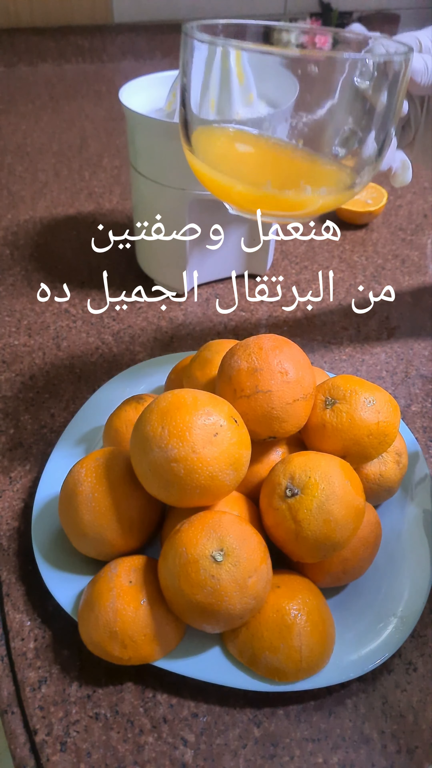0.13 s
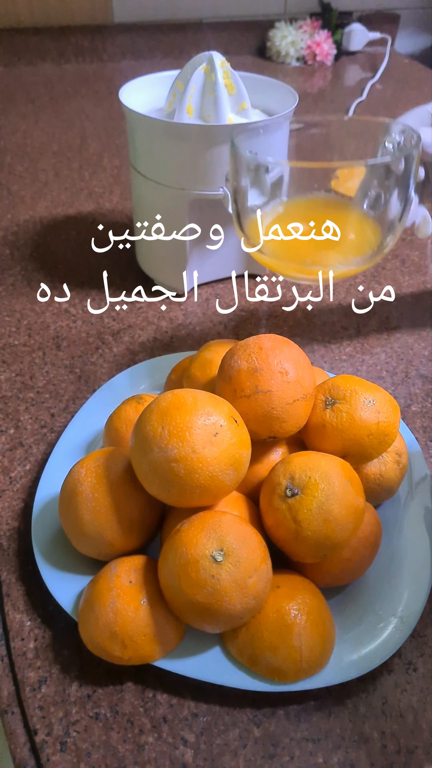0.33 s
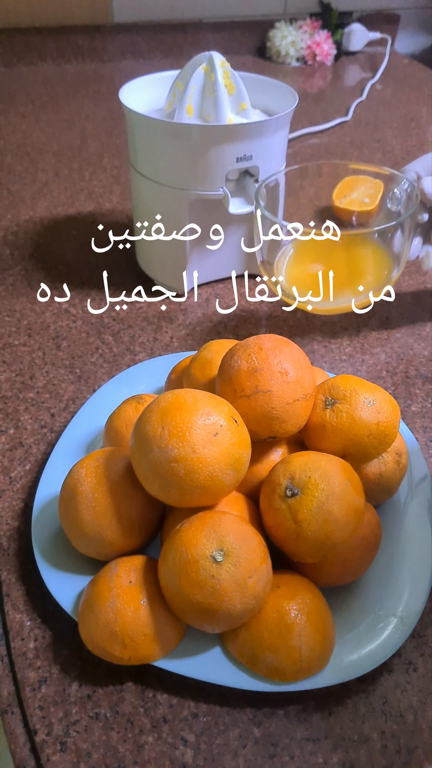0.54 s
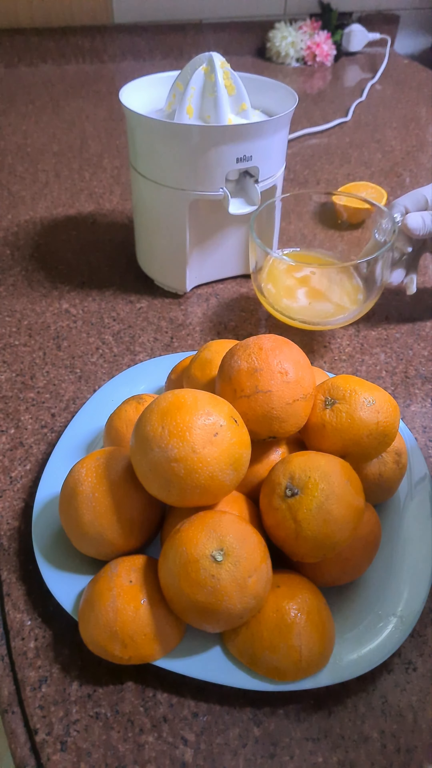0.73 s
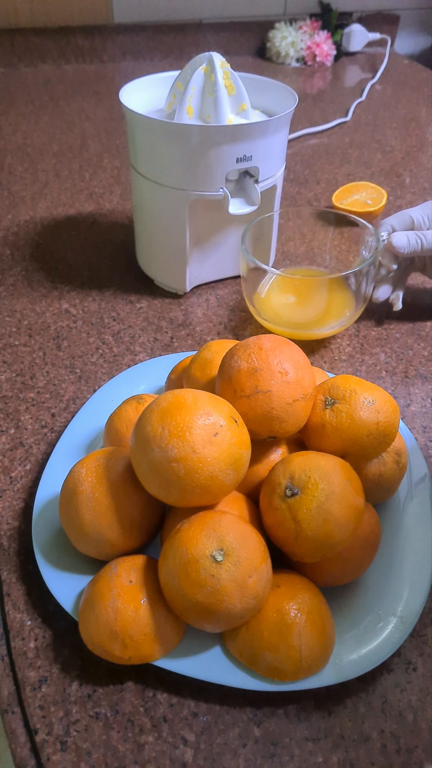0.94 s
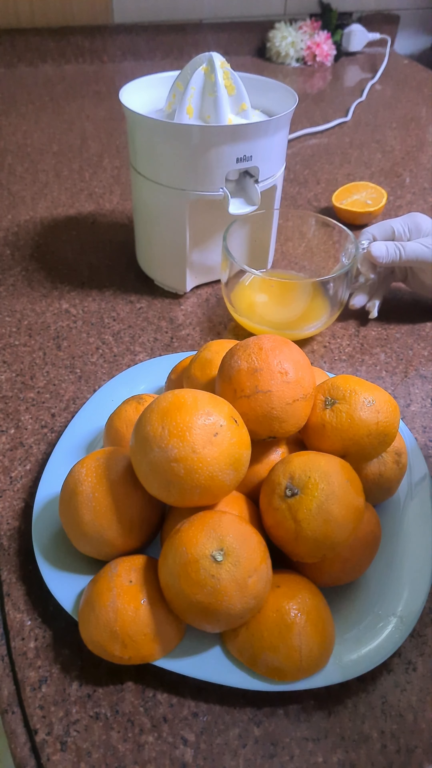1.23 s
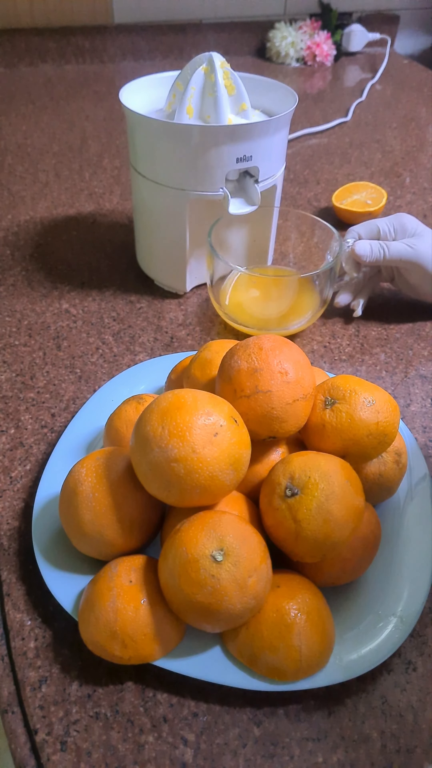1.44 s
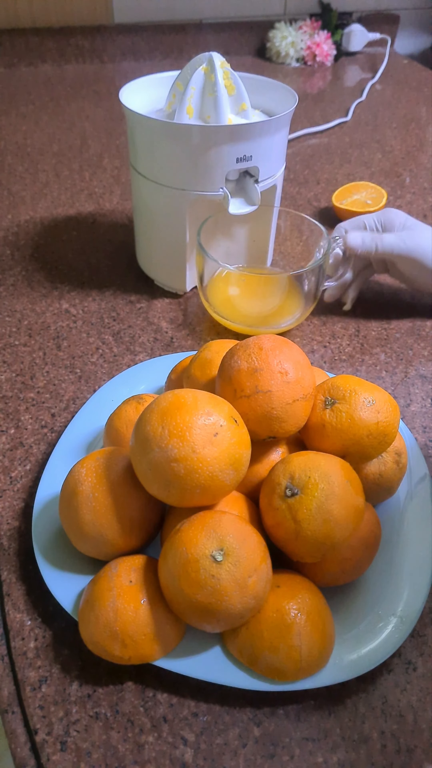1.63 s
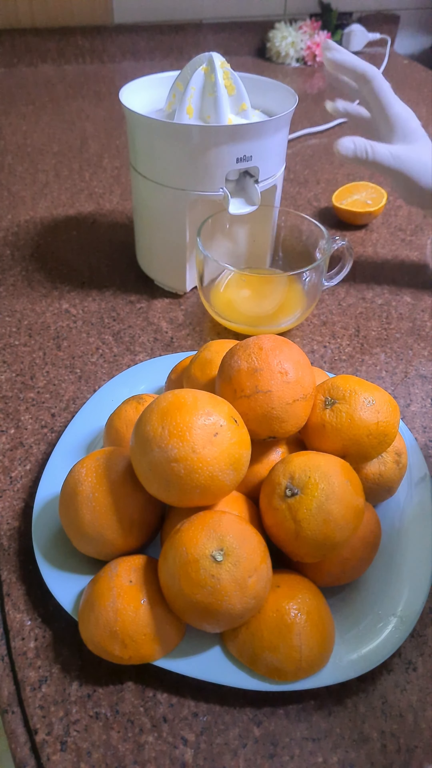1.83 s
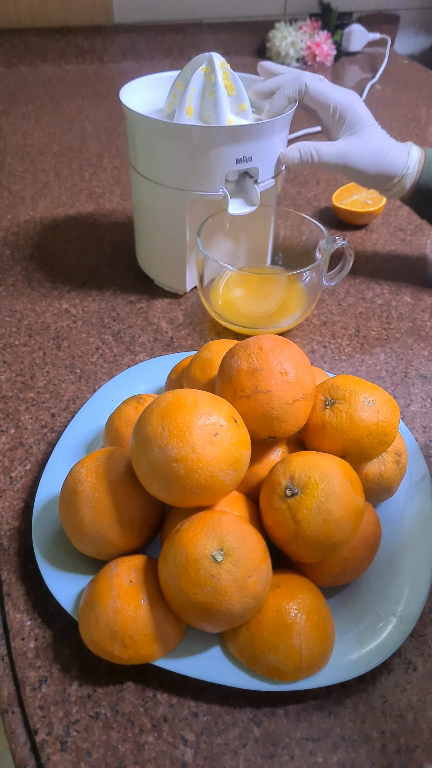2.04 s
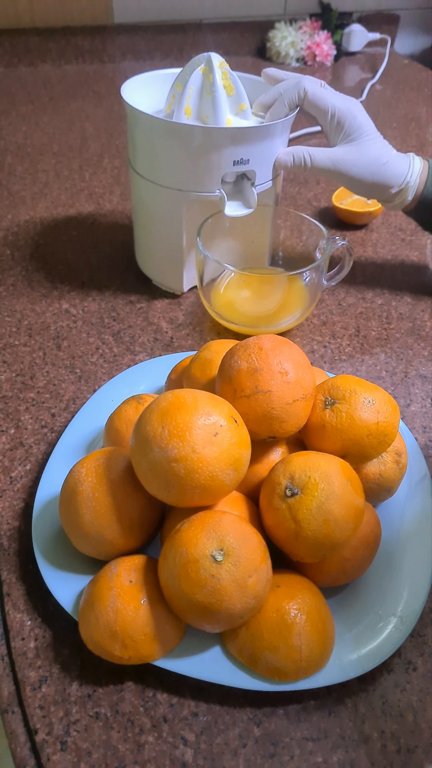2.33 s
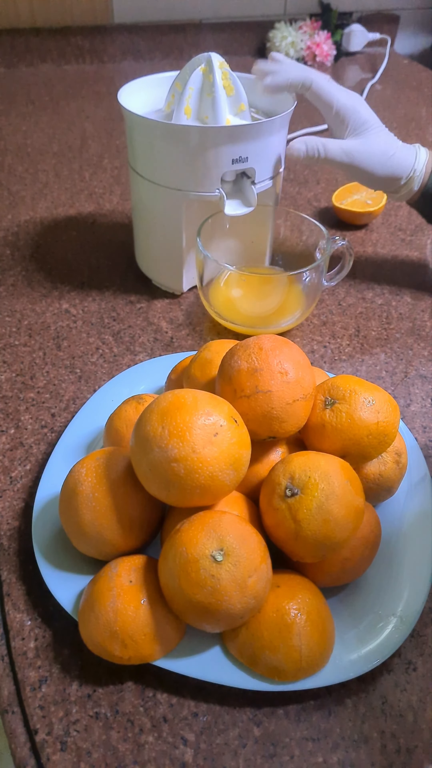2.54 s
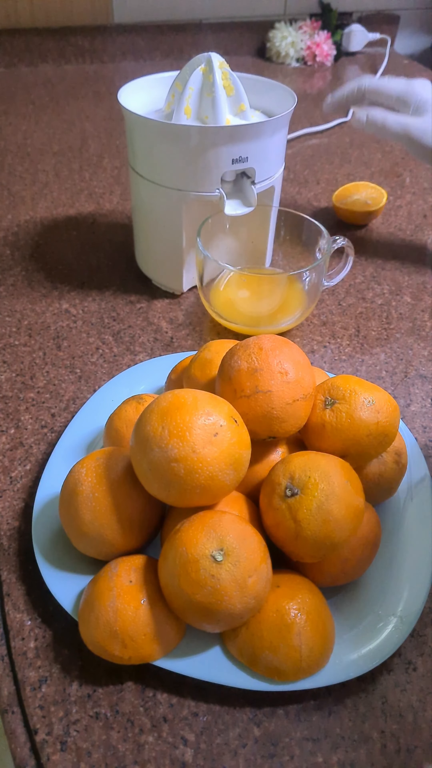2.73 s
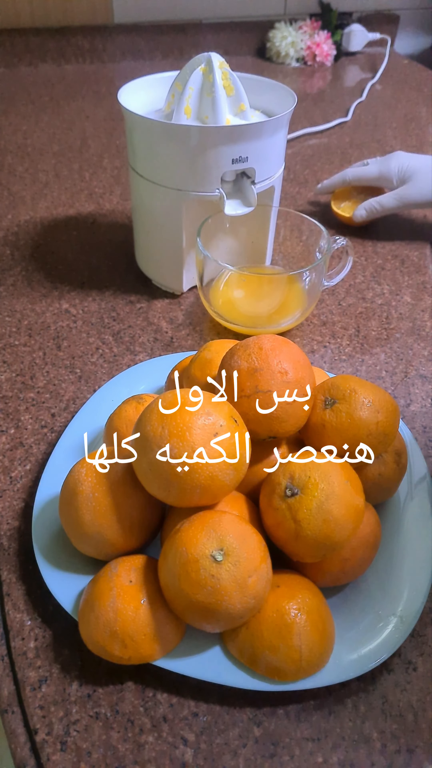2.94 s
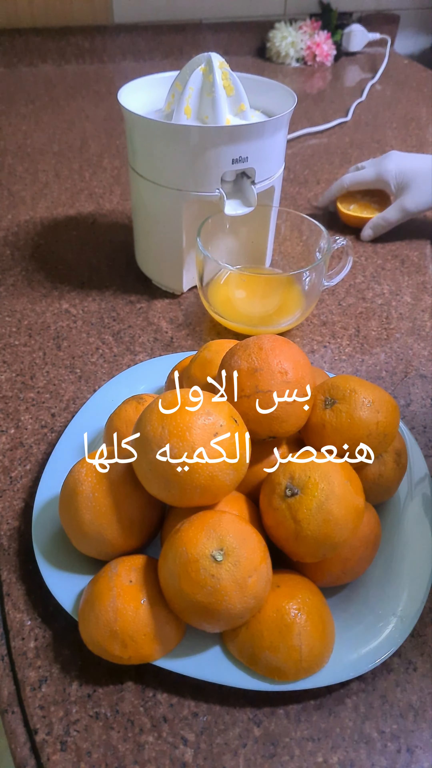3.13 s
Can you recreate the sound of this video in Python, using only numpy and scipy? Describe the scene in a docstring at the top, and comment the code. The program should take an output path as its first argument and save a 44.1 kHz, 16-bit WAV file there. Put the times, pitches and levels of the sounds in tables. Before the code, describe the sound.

In a small hard kitchen, heavy glass lands on stone, plastic gets one hollow knock, and a geared juicer motor starts buzzing steadily.

```python
"""In a small, hard kitchen a glass mug lands, rocks and skids on a stone counter under an electric juicer.
A gloved hand rubs, taps the plastic bowl and knocks the cone: impulses excite short clacks and decaying modes.
Then the motor starts and slows a little under load. Its gears whine on multiples of the shaft speed,
its teeth scrape once each as noise bursts, and its cone rumbles with bumps that repeat every turn.
Faint squeaks are unsteady sines; shaped noise and wavering sines make the kitchen's air, hiss and hum."""
import sys
import numpy as np
from scipy import signal
from scipy.fft import rfft, irfft, next_fast_len
from scipy.io import wavfile

SR = 44100
rng = np.random.default_rng(int(sys.argv[2]) if len(sys.argv) > 2 else 0)


def to_wav(sig):
    """Store sig (one row per channel, or 1-D mono) as 16-bit WAV at the path in sys.argv[1].

    Samples outside -1..1 are clipped; the rate is SR.
    """
    pcm = np.clip(np.atleast_2d(sig), -1, 1) * 32767
    pcm = np.round(pcm).astype(np.int16)
    wavfile.write(sys.argv[1], SR, pcm.T)  # frames by channels


N = 329427
TIME = np.arange(N) / SR

# All levels in the tables are relative: layers are scaled again where they are mixed.
# Gear tones: shaft_multiple, light_load_db, medium_load_db, full_load_db
GEAR_TONES = [(13, -60, -58, -53), (18, -58, -55, -54), (22, -56, -57, -54), (26, -38, -40, -40),
              (30, -60, -50, -56), (35, -45, -51, -57), (39, -50, -44, -41), (47, -62, -49, -45),
              (48, -44, -41, -37), (50, -46, -47, -44), (52, -35, -30, -33), (56, -49, -46, -43),
              (65, -43, -45, -47), (69, -46, -49, -63), (74, -44, -60, -55), (78, -36, -54, -56),
              (82, -48, -56, -65), (91, -44, -57, -51), (95, -49, -63, -54), (99, -52, -63, -54),
              (104, -60, -65, -50), (109, -51, -60, -69), (112, -58, -48, -57), (117, -63, -49, -52),
              (120, -67, -59, -50)]
# Spectrum of the tooth scrape: frequency_hz, density_db
RATTLE_SPECTRUM = [(300, -20), (800, -6), (1250, -0.5), (1500, -3.5), (2100, -3.5), (2680, -0.5),
                   (2880, 4.5), (3150, -2.5), (3600, -4), (4300, -9.5), (6400, -13.5), (7250, -18),
                   (7900, -33.5), (12000, -29), (16000, -39)]
# Spectrum of the slack gears' chatter: frequency_hz, density_db
CHATTER_SPECTRUM = [(200, -32), (520, 3), (800, 2.5), (1200, 8.5), (1700, 5), (2200, 4.5), (3000, -23),
                    (7000, -55)]
# Spectrum of the turning cone: frequency_hz, density_db
RUMBLE_SPECTRUM = [(100, -10), (200, -8), (310, 4.5), (540, -1), (780, -3), (1200, 0), (2200, -4.5),
                   (4000, -46)]
# Jolts of the cone as it starts and snags: start_s, length_s, level_db
CONE_JOLTS = [(5.3, 0.051, -44), (6.43, 0.055, -41)]
# Stereo balance of the juicer: frequency_hz, left_minus_right_db
JUICER_TILT = [(200, 1), (700, 2.5), (1300, 1), (2400, -1), (4400, -3), (8000, 4), (15000, -2.5)]
# Glass mug rocking on the stone: start_s, level_db
MUG_IMPACTS = [(1.0061, -2), (1.0468, -9), (1.1394, -15), (1.1553, -21), (1.1649, -23), (1.2045, -22),
               (1.2976, -19), (1.3011, -22), (1.4312, -19), (1.5188, -31)]
# Stick-slip skids of its base: start_s, length_s, slip_rate_hz, level_db
MUG_SLIDES = [(1.266, 0.01, 583, -23), (1.285, .012, 593, -26)]
# Contact of glass on stone: frequency_hz, density_db
MUG_CONTACT = [(90, -34.5), (200, -6.5), (700, -2.5), (1000, 6.5), (1400, 0.5), (1750, 2.5), (2300, -7.5),
               (2750, -13), (3100, -27.5), (3650, -26.5), (4700, -28), (6000, -40.5), (7100, -49.5),
               (8000, -60.5), (12500, -45), (16000, -49)]
# Ringing of the glass: frequency_hz, level_db, t60_s
MUG_RING = [(1184, -24, .36), (935, -26, .25), (1790, -30, .08), (2500, -27, .15), (2772, -27, .12),
            (6654, -50, .22), (7058, -53, .16), (9050, -64, .22)]
# Finger tap on the juice bowl: start_s, level_db
BOWL_TAPS = [(2.354, -33)]
# Contact of finger on bowl: frequency_hz, density_db
BOWL_CONTACT = [(150, -4), (320, 15), (550, 14), (900, 6.5), (1500, 14), (2200, -10.5), (5000, -7.5),
                (7000, -21), (8500, -87), (16000, -24)]
# Ringing of the bowl: frequency_hz, level_db, t60_s
BOWL_RING = [(544, -16, .22), (1325, -19, .36), (1793, -16, .1), (2670, -32, .35), (2826, -37, .2),
             (4750, -34, .07)]
# Knock on the plastic cone: start_s, level_db
CONE_KNOCKS = [(4.189, -14)]
# Contact on the cone: frequency_hz, density_db
CONE_CONTACT = [(130, -32), (280, -7), (800, 8), (1300, 5), (1800, -6), (2200, -0.5), (2650, -10),
                (2950, -1.5), (3900, -1), (5200, -10.5), (7000, -23.5), (8500, -33.5), (12000, -22),
                (16000, -33)]
# Ringing of the cone: frequency_hz, level_db, t60_s
CONE_RING = [(572, -8, 0.077), (844, -18.5, 0.2), (1218, -15, 0.12), (1500, -46, .12), (2200, -29, 0.11),
             (3520, -33, 0.096)]
# Soft, dull touches of the hand: start_s, level_db
HAND_TOUCHES = [(2.0, -50.5), (2.045, -49), (2.11, -53), (2.16, -59), (2.53, -51), (4.418, -49),
                (4.516, -40.5), (4.817, -42.5), (4.873, -39.5)]
# Contact of the hand: frequency_hz, density_db
TOUCH_CONTACT = [(150, -18.5), (520, 6.5), (800, -5.5), (1400, -3.5), (2200, -13.5), (5000, -22.5),
                 (8500, -39), (16000, -38)]
# Small dry ticks of plastic: start_s, level_db
PLASTIC_TICKS = [(1.7793, -52.5), (1.985, -43.5), (3.6799, -59.5), (4.5097, -41), (4.6933, -51),
                 (5.249, -49), (7.1536, -34.5), (7.2195, -37), (7.3494, -36)]
# Contact of a tick: frequency_hz, density_db
TICK_CONTACT = [(800, -27), (2800, 6), (6500, 3), (8500, -15.5), (12000, -4), (16000, -15)]
# Strokes of the rubber glove on peel and plastic: start_s, length_s, level_db
RUBBING_STROKES = [(1.76, 0.061, -63), (2.68, 0.14, -65.5), (2.8, 0.54, -64.5), (3.33, 0.23, -62.5),
                   (3.63, 0.086, -64), (4.35, 1, -68)]
# Spectrum of the rubbing glove: frequency_hz, density_db
GLOVE_SPECTRUM = [(300, 7), (600, 7), (1500, -6), (3200, -0.5), (6200, 0.5), (8300, -17), (12000, -7.5),
                  (16000, -22)]
# Faint thin squeaks: start_s, length_s, pitch_hz, level_db
RUBBING_SQUEAKS = [(.1, .5, 4820, -81), (1.63, .07, 4760, -68), (4.54, .28, 3290, -74)]
# Spectrum of the kitchen air: frequency_hz, density_db
AIR_SPECTRUM = [(25, -7), (55, -4.5), (110, -9.5), (150, -8), (220, -13.5), (310, -13.5), (410, -21),
                (540, -21.5), (900, -36), (1300, -32.5), (2300, -40.5), (5000, -67)]
# Spectrum of the faint hiss: frequency_hz, density_db
HISS_SPECTRUM = [(1000, -12), (2300, -9.5), (3150, 2), (4400, -6.5), (5600, -0.5), (6600, -9.5),
                 (7700, -25), (9500, -24), (11800, -8.5), (16000, -14)]
# Tones of the hum: pitch_hz, level_db
HUM_TONES = [(48.4, -62), (96.9, -70), (140, -66.5)]
# Stereo balance of the background: frequency_hz, left_minus_right_db
KITCHEN_TILT = [(50, -1), (200, -3.5), (600, 2.5), (2200, -3), (4000, 5), (12000, 6.5)]
# Reverberation of the kitchen: frequency_hz, t60_s
REVERBERATION = [(200, 0.81), (530, 0.61), (1400, 0.4), (3700, 0.42), (12000, 0.23)]

PINION_TEETH = 13
# the motor spins up, then the hand bears down evenly until the load is full
START_S, SPIN_UP_S, PRESS_S, PRESS_RISE_S = 5.28, 0.1, 5.5, 1.08
# shaft speed as the gears catch, running free, and its sag at full load
CATCH_HZ, FREE_HZ, SAG_HZ = 18, 25.75, 1.39
# play of the shaft: loose at the start until it settles, least when free, growing steeply near full load
START_PLAY_DEG, SETTLE_S, FREE_PLAY_DEG, LOAD_PLAY_DEG, PLAY_POWER = 5.5, 0.065, 0.38, 0.93, 4
# level of each layer running free, and what full load adds
WHINE_DB, WHINE_LOAD_DB = -28.5, 1.5
RATTLE_DB, RATTLE_LOAD_DB = -38, 2.5
RUMBLE_DB, RUMBLE_LOAD_DB = -48.5, 7.5
# the whine fades in while the teeth seat themselves
WHINE_ATTACK_S, WHINE_START_DB = 0.26, -10.5
# the cone bites into the fruit and the teeth rattle harder
BITE_S, BITE_RISE_S, BITE_DB = 5.8, 0.11, 3
# the slack gears chatter early on, then fall quiet
CHATTER_DB, CHATTER_ATTACK_S, CHATTER_HOLD_S, CHATTER_RELEASE_S = -36.5, 0.06, 0.3, 0.38
AIR_DB, HISS_DB = -60, -72
PORT_LAG_MS = 0.14  # arrival at the right port after the left
TOP_HZ = 15900


def juicer(tooth_decay=0.31, wear_db=2.5, scatter_db=3.0, slack_loss_db=1.3):
    """Periodic excitation by rotation: gear tones, a scrape for every tooth, and a cone that rumbles."""
    shaft_hz, load, play = drive()
    turns = np.cumsum(shaft_hz) / SR
    tooth, mesh = np.divmod(turns * PINION_TEETH, 1)
    tooth = tooth.astype(int)
    # each tooth keeps its own wear, so the clatter repeats every turn, with scatter from stroke to stroke
    worn_db = wear_db * rng.standard_normal(PINION_TEETH)[tooth % PINION_TEETH]
    size_db = worn_db + scatter_db * rng.standard_normal(2 ** 13)[tooth]
    scrape = undb(size_db) * np.exp(-mesh / tooth_decay) * rng.standard_normal(N)
    rattle = unit(in_room(colour(scrape, RATTLE_SPECTRUM), wet_db=4.5, near_db=-16))
    chatter = unit(in_room(colour(scrape, CHATTER_SPECTRUM), wet_db=6, near_db=12))

    # the same bumps on every turn of the shaft, over the noise of rubbing
    bumps = np.interp(turns % 1, np.linspace(0, 1, 256), rng.standard_normal(256))
    rubbing = diffuse(N) + undb(-9.5) * bumps
    rumble = unit(colour(rubbing, RUMBLE_SPECTRUM)) * undb(1.1 * walk(20))

    # teeth that bounce in their slack give less tone
    unseated_db = WHINE_START_DB * (1 - ramp(START_S, WHINE_ATTACK_S))
    whine_db = WHINE_DB + WHINE_LOAD_DB * load + unseated_db - slack_loss_db * play
    tones = undb(whine_db) * whine(shaft_hz, turns, load, play)

    # faster teeth strike harder
    rattle_db = RATTLE_DB + RATTLE_LOAD_DB * load + BITE_DB * ramp(BITE_S, BITE_RISE_S)
    rattle_gain = (shaft_hz / FREE_HZ) ** 2 * undb(rattle_db)
    rumble_gain = undb(RUMBLE_DB + RUMBLE_LOAD_DB * load) + swells(CONE_JOLTS)
    release_s = START_S + CHATTER_ATTACK_S + CHATTER_HOLD_S
    slack = ramp(START_S, CHATTER_ATTACK_S) - ramp(release_s, CHATTER_RELEASE_S)
    sound = tones + rattle_gain * rattle + rumble_gain * rumble + undb(CHATTER_DB) * slack * chatter
    switched_on = ramp(START_S, 0.023) ** 2
    return lean(sound * switched_on, JUICER_TILT)


def drive():
    """Motor under load: pressing slows the shaft and widens its play (gives Hz, load 0-1, degrees)."""
    load = ramp(PRESS_S, PRESS_RISE_S)
    shaft_hz = CATCH_HZ + (FREE_HZ - CATCH_HZ) * ramp(START_S, SPIN_UP_S) - SAG_HZ * load
    unsettled = np.exp(-np.maximum(TIME - START_S, 0) / SETTLE_S)
    play = FREE_PLAY_DEG + START_PLAY_DEG * unsettled + LOAD_PLAY_DEG * load ** PLAY_POWER
    return shaft_hz, load, play


def whine(shaft_hz, turns, load, play, flutter_db=2.5, throb_db=1.24, echo_db=-2,
          shell_width_hz=6, shell_db=8, side_db=-0.5, side_play=0.31):
    """Harmonic series of the shaft: tooth-mesh harmonics and the side tones of uneven teeth."""
    shell_hz = 1998
    wobble = np.radians(play) * walk(55)  # play in the shaft smears the high tones most
    grab_db = throb_db * load * walk(70)  # under load the teeth grab and let go in quick bursts
    out = np.zeros((2, N))
    on = TIME > START_S
    for k, *levels in GEAR_TONES:
        is_mesh = k % PINION_TEETH == 0
        hz = k * shaft_hz[on]
        angle = k * (2 * np.pi * turns + wobble * (1 if is_mesh else side_play))[on]
        db = np.interp(load[on], np.linspace(0, 1, len(levels)), levels) + (0 if is_mesh else side_db)
        db = db + (grab_db + flutter_db * walk(22))[on]
        # a tone crossing the shell's resonance flares up
        db = db + shell_db / (1 + ((hz - shell_hz) / shell_width_hz) ** 2)
        for ch in range(2):
            # reflections add a restless copy, different at each port and stronger for short waves
            restless = (walk(26)[on] + 1j * walk(26)[on]) / np.sqrt(2)
            echo = undb(echo_db) * np.minimum(hz / 1200, 1) * restless
            lag = 2 * np.pi * hz * ch * PORT_LAG_MS / 1000
            out[ch, on] += undb(db) * np.real((1 + echo) * np.exp(1j * (angle - lag)))
    return out / np.sqrt(np.mean(out[:, on] ** 2))


def mug():
    """Impact and stick-slip friction: thick glass lands, rocks and skids on the stone."""
    slips = []
    for s, length, hz, db in MUG_SLIDES:
        for k in range(int(length * hz)):
            slips.append((s + (k + 0.12 * rng.standard_normal()) / hz, db))
    skid = colour(blows(slips), [(600, 2.5), (1200, -5.5), (1800, 1.5), (2400, -6.5), (4000, -18.5)])
    glass = struck(blows(MUG_IMPACTS) + skid, MUG_CONTACT, MUG_RING, ring_db=-9.0)
    return in_room(glass, wet_db=-3.0, near_db=-2.5)


def plastic():
    """Impulse response of light shells: a bowl tap, a cone knock, soft touches and small dry ticks."""
    bowl = struck(blows(BOWL_TAPS), BOWL_CONTACT, BOWL_RING, ring_db=-0.5)
    cone = struck(blows(CONE_KNOCKS), CONE_CONTACT, CONE_RING, ring_db=-8.0)
    touches = struck(blows(HAND_TOUCHES), TOUCH_CONTACT, [], ring_db=0)
    ticks = struck(blows(PLASTIC_TICKS), TICK_CONTACT, [], ring_db=0)
    return (undb(-0.5) * in_room(bowl, wet_db=3, near_db=7)
            + undb(-1) * in_room(cone, wet_db=4.0, near_db=5.5)
            + undb(-1.0) * in_room(touches, wet_db=7.5, near_db=6)
            + undb(5.0) * in_room(ticks, wet_db=5.5, near_db=3.5))


def blows(hits):
    """Impulsive force: one single-sample pulse for each start_s, level_db."""
    x = np.zeros(N)
    for s, db in hits:
        x[int(s * SR)] += undb(db)
    return x


def struck(force, clack, modes, ring_db):
    """Modal superposition: each impulse gives a short minimum-phase clack and rings decaying modes."""
    t = TIME[:2 ** 15]
    # folding the cepstrum onto positive time makes the clack causal
    cepstrum = irfft(np.log(undb(across(clack, freqs(t)))))
    fold = 2. * (np.arange(len(t)) < len(t) // 2)
    fold[0] = 1
    body = irfft(np.exp(rfft(cepstrum * fold)))
    body = body / np.abs(body).max()
    for hz, db, t60 in modes:
        decay = np.exp(-np.log(1000) * t / t60)
        body = body + undb(db + ring_db) * np.sin(2 * np.pi * hz * t) * decay
    return signal.fftconvolve(force, body)[:N]


def glove(grain_db=3):
    """Sliding friction: rubber rubs in small uneven catches, as noise of restless level."""
    grains = diffuse(N) * undb(grain_db * walk(120))
    return unit(colour(grains, GLOVE_SPECTRUM)) * swells(RUBBING_STROKES)


def squeaks():
    """Frictional whistling: unsteady sines of rubbing that swell quickly and fade."""
    out = 0
    for s, length, hz, db in RUBBING_SQUEAKS:
        swell = np.sin(np.pi * np.sqrt(np.clip((TIME - s) / length, 0, 1)))
        gain = undb(db + 1.8 * walk(30.24)) * swell
        out = out + gain * np.sin(2 * np.pi * hz * TIME + 1.4 * walk(150))
    return in_room(out, wet_db=-2, near_db=-6)


def kitchen():
    """Diffuse field: low noise of the room, faint hiss, and a hum wavering in level and phase."""
    air = unit(colour(diffuse(N), AIR_SPECTRUM)) * undb(AIR_DB + walk(11))
    hiss = unit(colour(diffuse(N), HISS_SPECTRUM)) * undb(HISS_DB)
    hum = 0
    for hz, db in HUM_TONES:
        gain = np.sqrt(2) * undb(db + 2.5 * walk(5))
        hum = hum + gain * np.sin(2 * np.pi * hz * TIME + 2.7 * walk(7.6))
    return lean(air + hiss + hum, KITCHEN_TILT)


def in_room(x, wet_db, near_db, near_s=0.0033):
    """Precedence: direct sound reaches the left port first, then near scatter, then the room."""
    t = TIME[:2 ** 15]
    near = diffuse(len(t)) * np.exp(-t / near_s) * t
    near = near / np.sqrt(np.sum(near ** 2) / 2)
    response = undb(wet_db) * room_response() + undb(near_db) * near
    direct = np.array([x, np.interp(TIME - PORT_LAG_MS / 1000, TIME, x)])
    return direct + signal.fftconvolve(x[None], response, axes=1)[:, :N]


def room_response(build_s=0.0024):
    """Exponential reverberation off counter, tiles and cupboards: the treble dies first."""
    t = TIME[:2 ** 15]
    noise, out = diffuse(len(t)), 0
    spectrum, centres = rfft(noise), [hz for hz, _ in REVERBERATION]
    for share, (_, t60) in zip(np.eye(len(centres)), REVERBERATION):
        band = irfft(spectrum * across(list(zip(centres, share)), freqs(noise)))
        out = out + band * np.exp(-np.log(1000) * t / t60)
    out = out * (1 - np.exp(-t / build_s))
    return out / np.sqrt(np.sum(out ** 2) / 2)


def diffuse(size, apart_hz=1100):
    """Spatial coherence: noise at two ports, alike in the bass and unrelated in the treble."""
    mid, side = rng.standard_normal((2, size))
    side = colour(side, [(apart_hz / 16, -16), (apart_hz / 3, -11), (apart_hz, 0)])
    return np.array([mid + side, mid - side]) / np.sqrt(2)


def lean(x, balance):
    """Interaural level difference: tip a stereo sound left or right, band by band."""
    left = colour(x[0], [(hz, db / 2) for hz, db in balance])
    right = colour(x[1], [(hz, -db / 2) for hz, db in balance])
    return np.array([left, right])


def colour(x, points):
    """Linear filtering: multiply the spectrum by a curve of frequency_hz, level_db."""
    size = next_fast_len(x.shape[-1], True)
    gain = undb(across(points, np.fft.rfftfreq(size, 1 / SR)))
    return irfft(rfft(x, size) * gain, size)[..., :x.shape[-1]]


def across(points, f):
    """Logarithmic pitch scale: read frequency_hz, value points on a log-frequency axis."""
    hz, value = np.transpose(points)
    return np.interp(np.log(f + 1), np.log(hz), value)


def freqs(x):
    """Fourier analysis: frequencies in Hz of the spectrum of x."""
    return np.fft.rfftfreq(x.shape[-1], 1 / SR)


def walk(rate):
    """Random modulation: smooth chance of spread near 1 that changes about rate times a second."""
    knots = rng.standard_normal(2048)
    place = TIME * rate
    k = place.astype(int)
    ease = (place - k) ** 2 * (3 - 2 * (place - k))
    return knots[k % len(knots)] * (1 - ease) + knots[(k + 1) % len(knots)] * ease


def ramp(start_s, length_s):
    """Linear envelope: an even rise from 0 to 1."""
    return np.clip((TIME - start_s) / length_s, 0, 1)


def swells(rows):
    """Half-sine envelope: one arch of gain for each start_s, length_s, level_db."""
    return sum(undb(db) * np.sin(np.pi * ramp(s, length)) for s, length, db in rows)


def undb(db):
    """Logarithmic level: decibels to amplitude gain."""
    return 10 ** (np.asarray(db) / 20)


def unit(x):
    """Effective value: scale to rms 1."""
    return x / np.sqrt(np.mean(x ** 2))


def scene():
    """Superposition: everything on the counter, over the kitchen's background."""
    return mug() + plastic() + glove() + squeaks() + juicer() + kitchen()


def record(dry):
    """Band limiting: a high-pass thins the deepest bass and a steep low-pass cuts the top."""
    thinned = signal.sosfilt(signal.butter(3, 33, "high", fs=SR, output="sos"), dry)
    return signal.sosfilt(signal.ellip(10, .2, 80, TOP_HZ, fs=SR, output="sos"), thinned)


dry = scene()
out = record(dry)
to_wav(out)
```